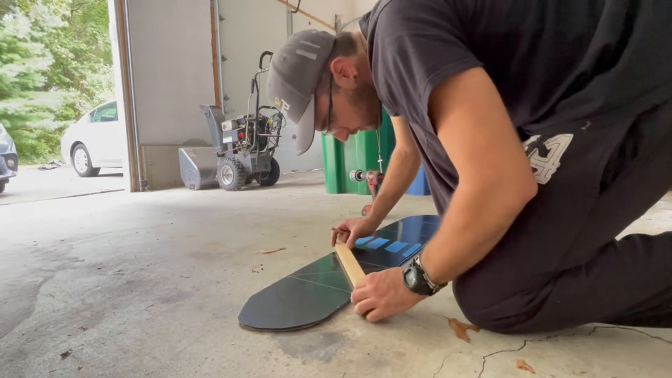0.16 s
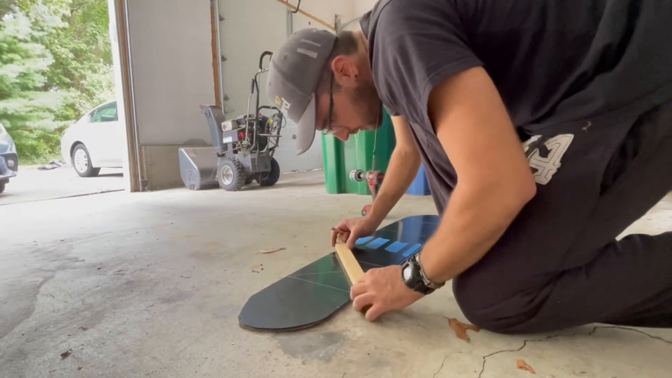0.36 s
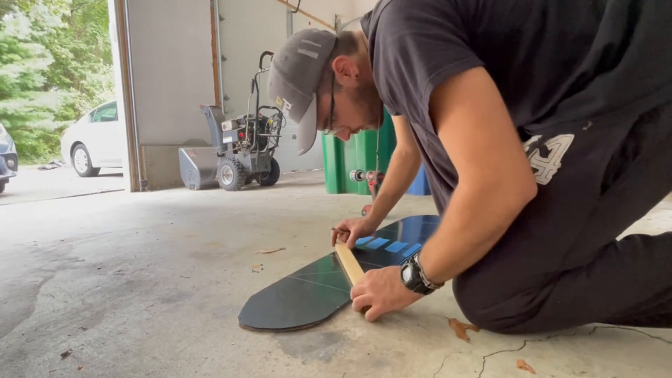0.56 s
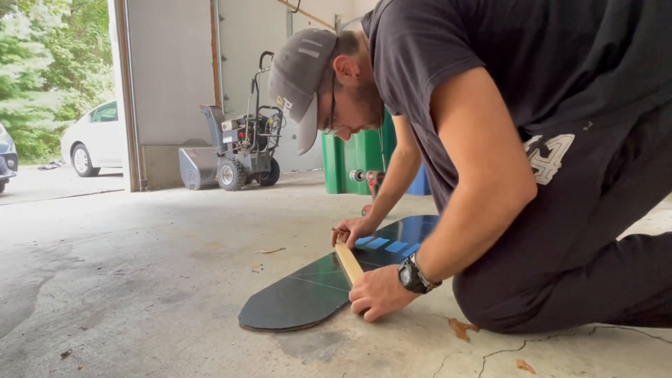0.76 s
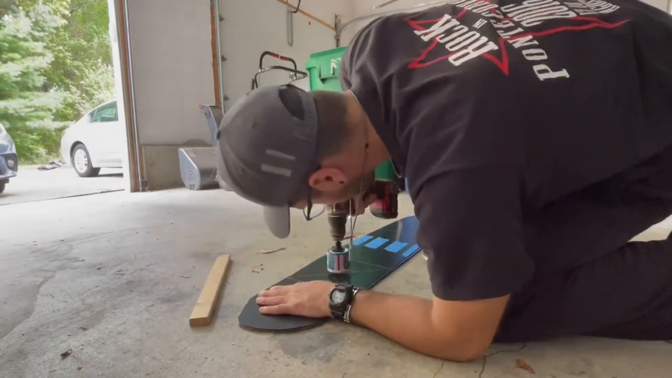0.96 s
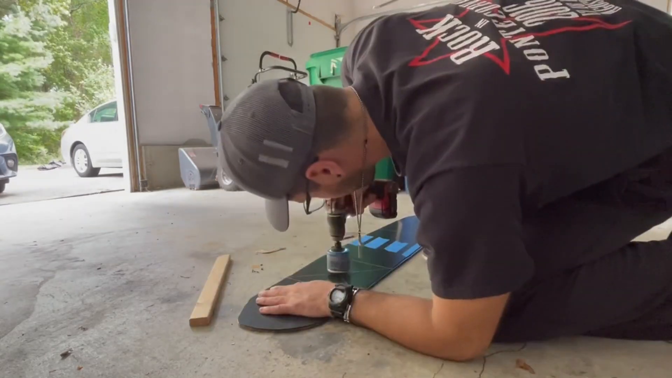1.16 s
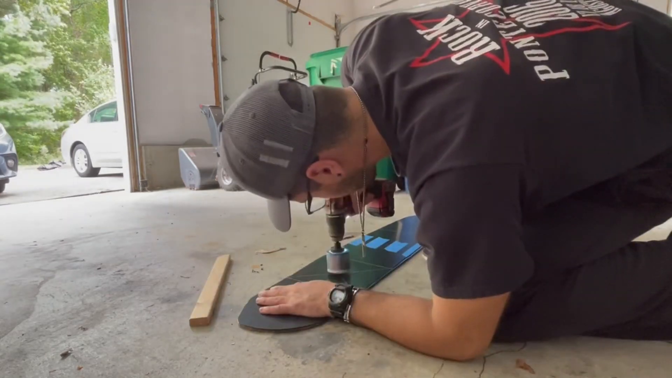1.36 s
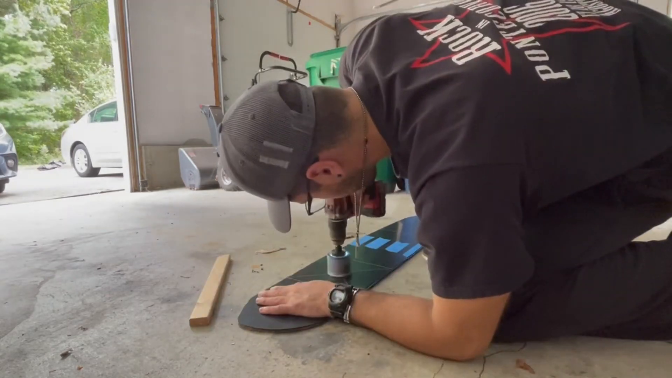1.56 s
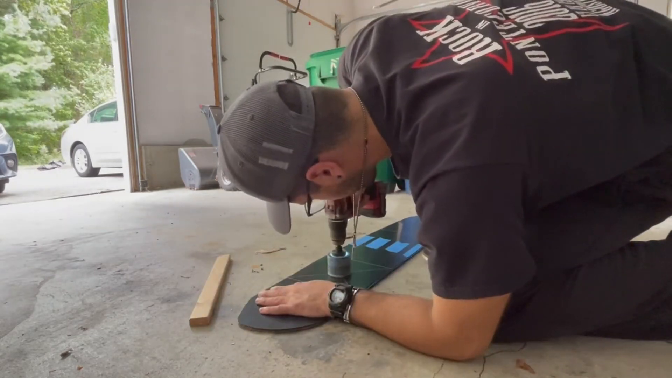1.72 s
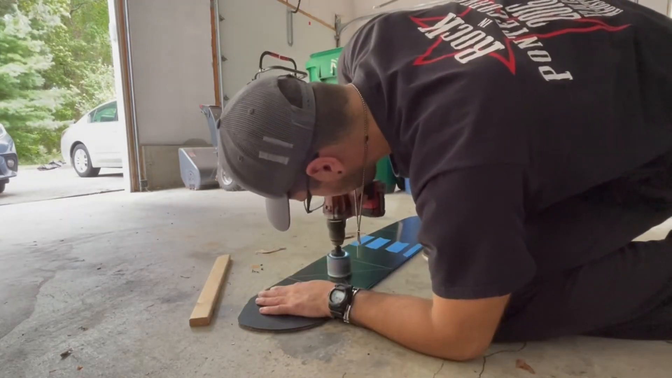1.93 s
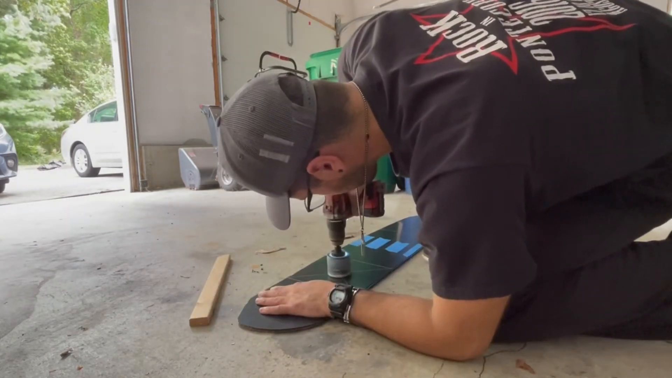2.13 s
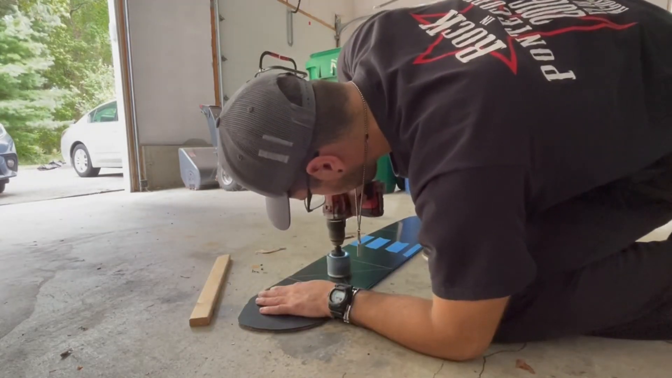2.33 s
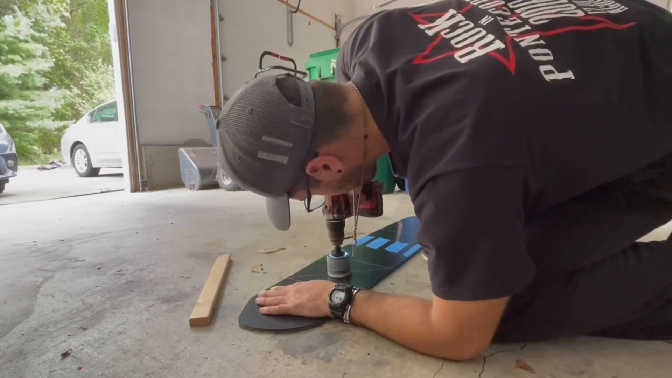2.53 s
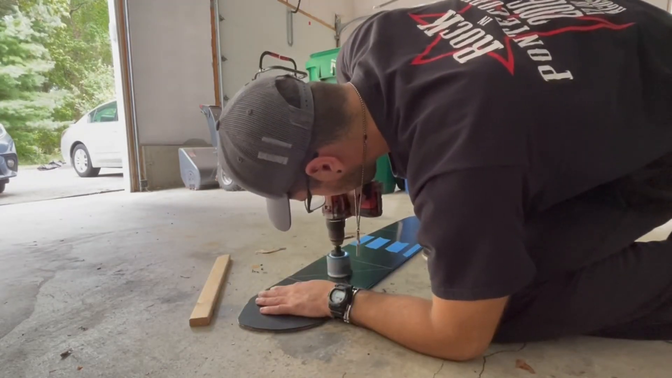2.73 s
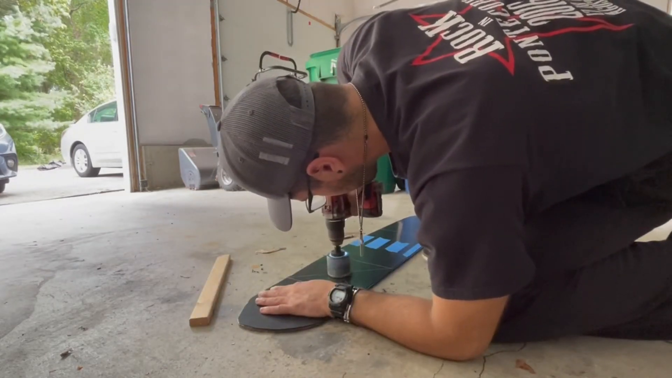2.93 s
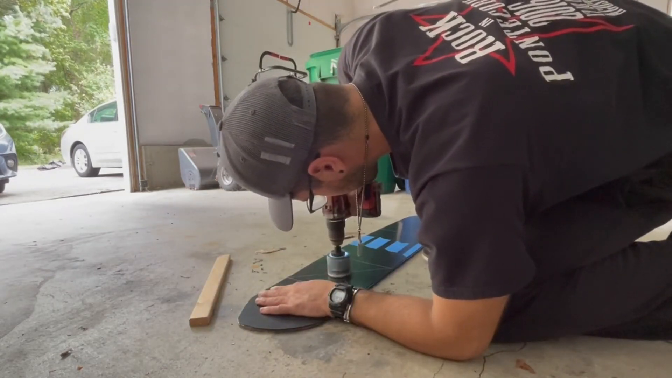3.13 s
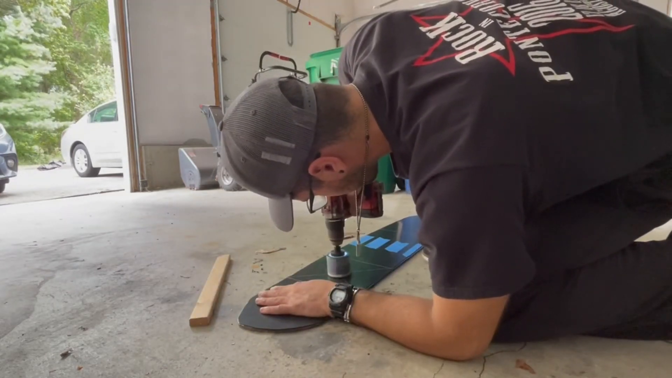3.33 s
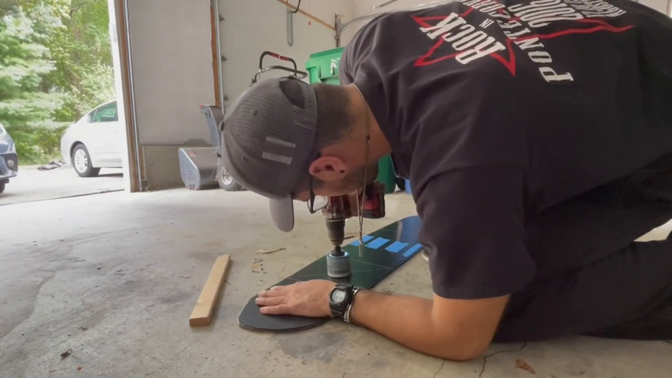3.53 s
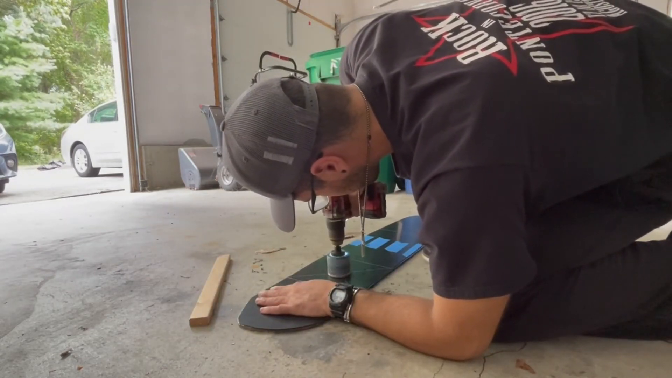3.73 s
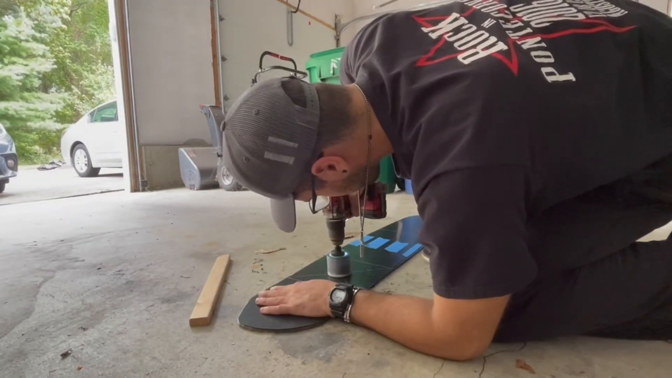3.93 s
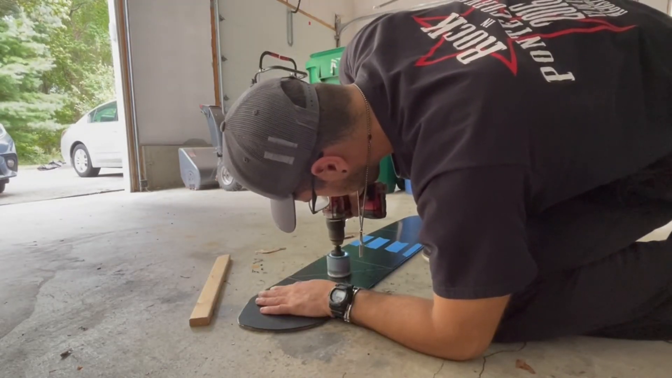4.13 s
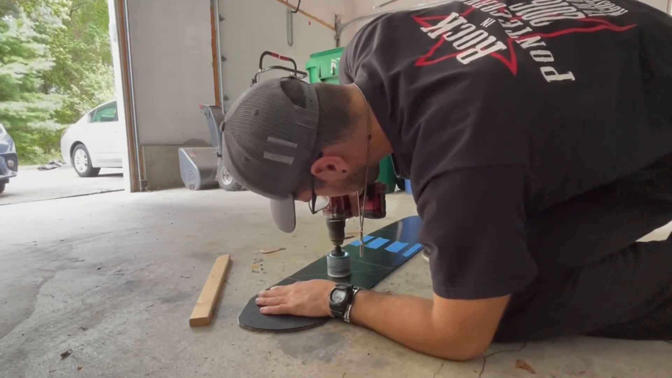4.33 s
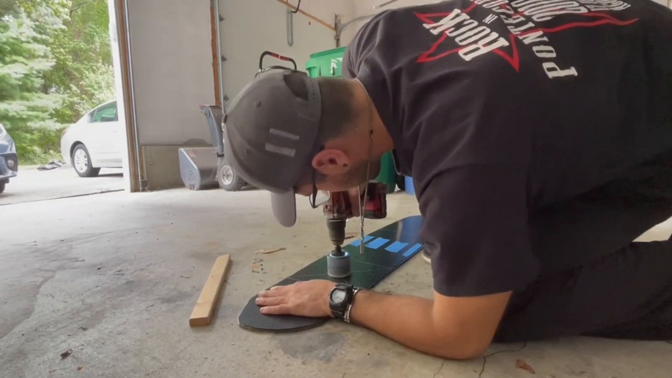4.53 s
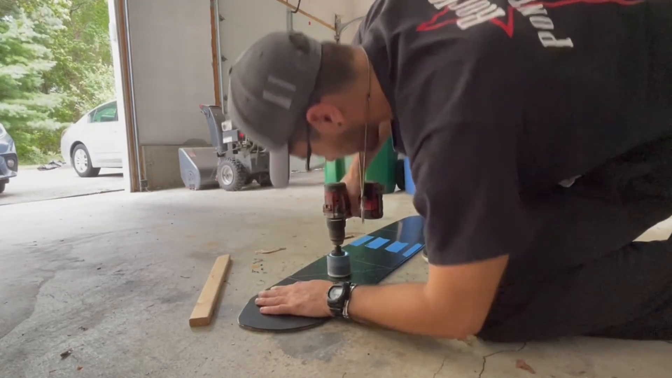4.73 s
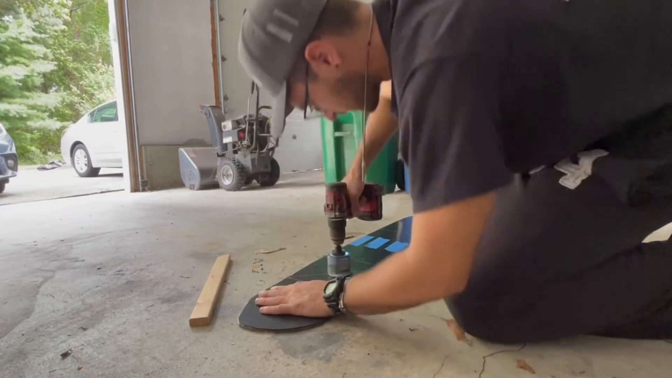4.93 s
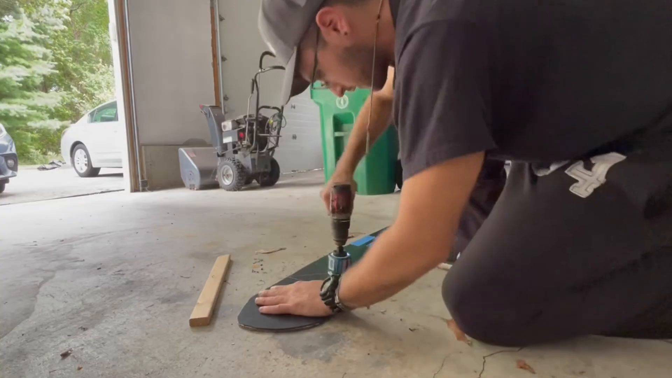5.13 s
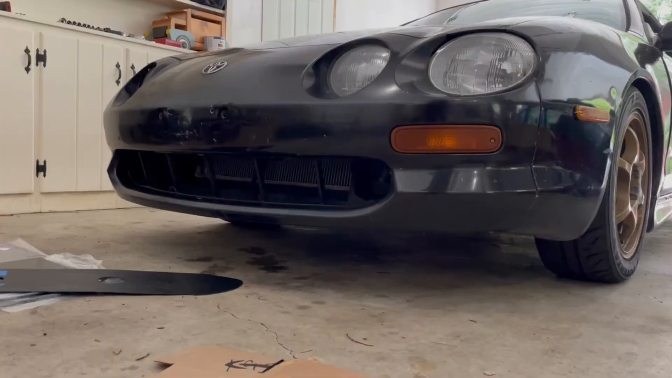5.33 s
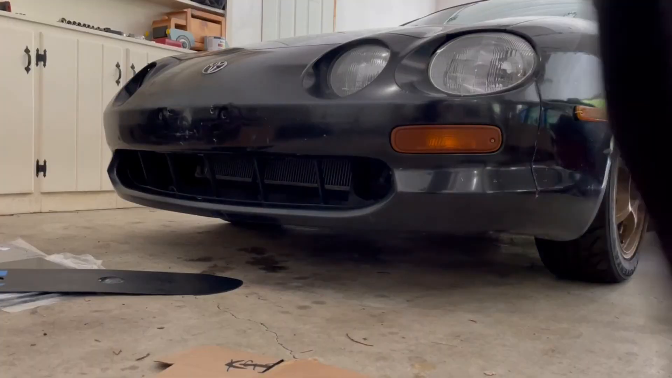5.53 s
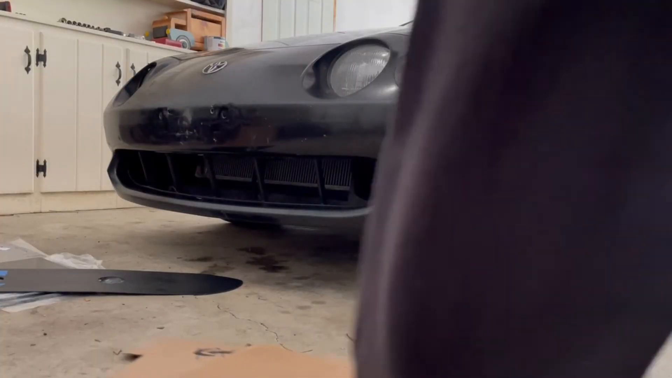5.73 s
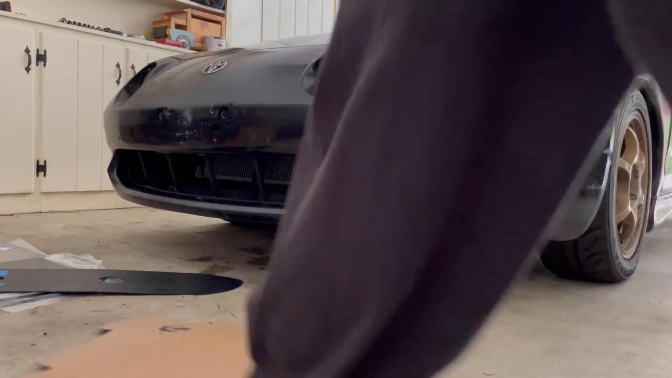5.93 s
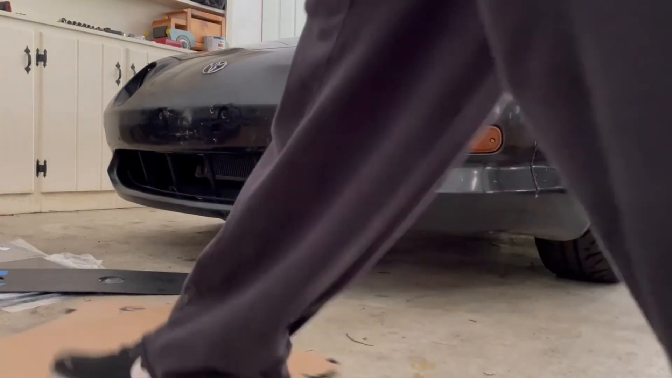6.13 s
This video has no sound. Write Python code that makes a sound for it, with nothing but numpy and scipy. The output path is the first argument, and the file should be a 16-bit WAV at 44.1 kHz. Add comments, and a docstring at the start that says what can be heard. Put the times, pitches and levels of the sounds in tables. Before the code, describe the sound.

A cordless drill with a hole saw spins up in a garage, whines and grinds through a plastic panel, stops, then something scrapes over gritty concrete.

```python
"""Outdoor air, insects, a far rumble and a low tone come first, all made of shaped noise and a sine.
Then a cordless drill with a hole saw (a toothed cup) starts, cuts a plastic panel on a garage floor and stops.
Its motor sings as sines around a switching tone, its gears whine on a moving pitch, and noise grinds the panel.
The second scene is a quieter garage corner: a tap with a falling pitch, then noise drags over gritty concrete."""
import sys
import numpy as np
from scipy import signal
from scipy.fft import rfft, irfft, next_fast_len
from scipy.io import wavfile
from scipy.ndimage import uniform_filter1d, map_coordinates

SR = 44100
rng = np.random.default_rng(int(sys.argv[2]) if len(sys.argv) > 2 else 0)


def bounce(signal):
    """Save signal as a 16-bit WAV file at the path given by the first command-line argument."""
    frames = np.transpose(np.atleast_2d(signal))
    limited = np.clip(frames, -1, 1)
    pcm = np.round(limited * 32767).astype(np.int16)
    wavfile.write(sys.argv[1], SR, pcm)


N = 276418

EDIT_S = 5.343  # the second scene begins
TOP_HZ = 15780  # nothing sounds above this

# Colour of the air at the open door, middle and side: (f/Hz, relative level/dB)
DOOR = [(15, -40), (25, 6), (123, -1), (401, -12), (949, -14.5), (1380, -21.5), (4910, -22.5),
        (5930, -20.5), (12900, -38), (15600, -69)]
DOOR_SIDE = [(15, -60), (25, -46), (140, -20), (282, -22), (786, -18), (1760, -29.5), (6090, -30),
             (11900, -50), (15600, -39)]
# Colour of the insects: (f/Hz, relative level/dB)
INSECTS = [(4600, -41), (5200, -1), (6000, 0), (6700, 1), (7200, -42)]
# A low tone from outside: (t/s, f/Hz, level/dB)
DRONE = [(0.0, 138.6, -55.5), (0.698, 141.4, -60.5), (0.874, 135, -63), (0.93, 127, -78)]

# Strength of the drilling noise: (t/s, gear rush level/dB, panel grind level/dB)
DRILL = [(.93, -67, -64), (1.13, -53, -57), (1.37, -46, -53), (1.49, -31.5, -49), (1.53, -28.5, -49),
         (1.536, -28.5, -35.5), (1.69, -28, -36.5), (3.45, -28.5, -28.5), (4.51, -29, -29),
         (4.86, -26.5, -26), (4.98, -33.5, -31.5), (5.0, -38, -34), (5.08, -46.5, -43), (5.34, -58.5, -54)]
# Colour of the gear rush, middle and side: (f/Hz, relative level/dB)
GEARS = [(710, -9.5), (1200, -0.5), (1490, -8), (2100, -1.5), (3150, -4.5), (4130, 0), (4900, -1.5),
         (6010, -6.5), (7530, -0.5), (9230, -11), (10800, -7), (13200, -18.5), (14000, -43), (14600, -81)]
GEARS_SIDE = [(710, -30), (1200, -8.5), (3020, -3), (4550, -1), (5880, -0.5), (7610, -9.5), (8850, -4),
              (11000, -19), (12300, -42), (14000, -8), (15600, -27)]
# Colour of the panel grind, middle and side: (f/Hz, relative level/dB)
PANEL = [(18, -48), (30, -23), (76, -20), (97, -11.5), (157, -8), (191, -14), (227, -10.5), (410, -10.5),
         (530, -8), (606, -8.5), (908, -3.5), (1170, -5.5), (3000, -11.5), (3900, -18), (6600, -120)]
PANEL_SIDE = [(18, -64.5), (30, -40), (160, -12), (315, -6), (794, 0), (1240, -1), (3000, -3), (3900, -31),
              (6600, -120)]
# The panel's boom: (t/s, f/Hz, width/Hz, level against grind/dB, lower mode level against grind/dB)
BOOM = [(1.5, 959, 279.7, -2.5, -21), (3.06, 960, 260.5, -12, -21), (3.2, 915, 169.7, -3.5, -17),
        (3.72, 915, 240, -8, -23), (3.9, 889, 120.2, -8, -15), (4.58, 912.4, 129.2, -13, -22),
        (4.67, 800, 330, -6, -13), (4.97, 798, 328.5, -3.5, -8)]
# The panel shakes until the cup seats: (t/s, level/dB before a fixed cut)
SHUDDER = [(1.5, -61), (1.57, -44), (1.85, -52), (2.28, -35), (2.34, -50), (2.9, -66), (2.98, -51),
           (3.7, -61)]
# The freed panel rocks on the floor: (t/s, level/dB)
ROCKING = [(4.95, -54), (5.12, -49), (5.25, -60), (5.34, -57)]
LOW_MODE_HZ = 521
LEAD_S = 4.5e-5  # the panel reaches the left channel this much sooner

# The cup's own ringing modes: (f/Hz, width/Hz, level/dB)
CUP_MODES = [(1024, 140, -14), (2230, 490, -7.5), (3450, 360, -1), (3980, 810, -1)]
# The cup shakes harder: (t/s, extra level/dB)
JOLTS = [(.984, 12), (1.1, 6.8)]
JOLT_S = 0.031  # rise time, and fall time, of a jolt
RATTLE_DB = -4.5  # the free cup against the gear rush

# The motor: (t/s, commutation f/Hz before wavering, sideband level/dB before fades)
MOTOR = [(.955, 17, -74), (.99, 55, -50), (1.04, 85, -62), (1.09, 120, -53), (1.12, 180, -52),
         (1.3, 230, -49), (1.41, 260, -57), (1.52, 1040, -44), (2.3, 1020, -44), (2.85, 903, -46),
         (3.2, 931, -46), (3.6, 1019, -46), (4.1, 1064, -46), (4.6, 1081, -45), (4.84, 1048, -46),
         (4.9, 870, -47), (4.95, 770, -41), (4.99, 560, -43), (5.01, 95, -47), (5.1, 36, -55),
         (5.2, 36, -48.5), (5.26, 25, -53.5), (5.34, 9.5, -74)]
# How the channels share the motor's song: (f/Hz, left lead/rad, left over right/dB)
MOTOR_STEREO = [(7000, -.5, -1), (7800, -.5, -1), (8400, -.4, -8), (8800, 2.8, -9)]
# Planet-gear hum: (multiple of the planet-gear rate, relative level/dB)
HUM = [(2, -10), (3, -5), (4, -9), (6, -11)]
# Strength of that hum: (t/s, level/dB)
HUM_LEVEL = [(1.5, -60), (1.94, -57), (2.02, -43), (2.3, -44.5), (2.86, -50), (3.3, -41), (3.67, -45),
             (3.85, -36.5), (4.6, -37.5), (4.95, -47)]
SWITCH_HZ = 7780
TURNS_PER_HUM = 19.3  # commutation rate over planet-gear rate
FAST_HZ = 340  # above this commutation rate the fades begin
LOWER_LOSS_DB, OTHERS_LOSS_DB, CARRIER_DB = 2, 13, -5
BRAKE_LOSS_DB = 12  # the lower sideband fades while the brake acts

# Ticks of the cup as it starts and as it slows: (t/s, level/dB before a fixed boost)
TICKS = [(.972, -43), (5.014, -32), (5.038, -27), (5.046, -29), (5.061, -27), (5.079, -35), (5.089, -32),
         (5.172, -39), (5.189, -36), (5.201, -28.5), (5.229, -33), (5.322, -45)]
TICK_HZ, TICK_T60_S = 3350, 0.012
# The garage walls' answer: (f/Hz, time to fall 60 dB/s)
WALL_DECAY = [(200, 1), (2000, 0.69), (10000, 0.019)]
# Knocks of the tool and stones cracking:
# (t/s, level/dB before a fixed cut, low ring f/Hz, high ring f/Hz, high over low ring/dB, time to fall 60 dB/s)
KNOCKS = [(.985, -33, 1020, 3300, 5, 0.01), (1.533, -2.5, 940, 2420, -4, 0.0083),
          (1.556, -9.5, 1000, 2070, 4, .012), (1.601, -12, 1240, 2190, -15, 0.0096),
          (4.99, -21, 2380, 3240, 8, 0.015), (5.29, -10, 750, 1820, -1.5, 0.0096),
          (5.575, -22, 1104, 3600, 1, 0.0045), (5.6, -18, 1500, 3360, 12, 0.0097),
          (5.632, -11, 1390, 3530, 2, 0.014), (5.646, -11.5, 1310, 2800, 19, 0.0064),
          (5.658, -13, 1400, 3000, 4, 0.0059)]

# Gear whine of the unhindered saw: (t/s, f/Hz, level/dB before fixed trims)
WHINE = [(1.395, 1050, -44), (1.425, 1580, -38), (1.45, 2250, -37), (1.472, 3150, -35), (1.492, 3750, -33),
         (1.51, 4150, -34), (1.57, 4180, -33), (1.625, 4500, -33.5), (1.78, 4450, -33), (2.05, 4250, -34.5),
         (2.79, 3810, -35), (2.9, 3680, -36), (3.06, 3740, -35.5), (3.17, 3690, -37.5), (3.43, 3930, -38.5),
         (3.47, 4060, -34), (3.65, 4110, -34.5), (3.79, 4195, -37), (4.01, 4263, -39.5),
         (4.49, 4365, -39.5), (4.7, 4360, -37.5), (4.72, 4270, -39.5), (4.865, 4230, -37),
         (4.885, 3800, -37), (4.92, 3750, -70)]
# The teeth snag and hold the gears back: (t/s of the lowest pitch, pitch drop/Hz, time to sink/s)
SNAGS = [(1.574, 500, .012), (1.71, 400, .085), (1.815, 300, .03), (1.942, 400, .02), (2.085, 320, .06),
         (2.19, 290, .04), (2.335, 340, .05), (2.5, 250, .11), (2.575, 400, .018), (2.66, 210, .025),
         (2.757, 190, .047), (2.84, 210, .03), (3.0, 250, .045), (3.125, 250, .073), (3.235, 210, .065)]
# Whine overtones that sweep through the housing's resonance: (multiple, relative level/dB)
SPIN_UP = [(2, -1.5), (3, -1.5)]
RECOVER_S, MESH_LEAD = .055, .3  # time to recover from a snag; left lead in radians
HOUSING_HZ, HOUSING_WIDTH_HZ, SCREECH_HZ, SCREECH_WIDTH_HZ = 3900, 800, 7600, 700

# Colour of the air in the quiet corner, middle and side: (f/Hz, relative level/dB)
CORNER = [(15, -41), (25, 5), (70, 0), (2070, -20.5), (2310, -14), (2600, -21), (6430, -26), (15600, -55)]
CORNER_SIDE = [(15, -32), (25, -1), (2800, -13), (6250, -18), (10700, -33), (15600, -20)]
# Strength of the dragging on concrete: (t/s, rumble level/dB, grit level/dB)
DRAG = [(5.568, -45, -38), (5.597, -37, -32), (5.602, -30.5, -23), (5.635, -27.5, -19.5),
        (5.67, -30.5, -20.5), (5.8, -27.5, -25.5), (5.86, -26.5, -23.5), (6.093, -26, -25),
        (6.12, -33, -34.5), (6.195, -33, -32.5), (6.268, -38.5, -41)]
# Colour of the rumble, middle and side: (f/Hz, relative level/dB)
RUMBLE = [(24, -59), (40, -14), (130, -9.5), (242, -1.5), (341, -0.5), (800, -0.5), (2000, -7), (2600, -12),
          (4400, -120)]
RUMBLE_SIDE = [(24, -60), (40, -28), (199, -24), (285, -13), (347, -11), (813, -5), (2000, -6), (2600, -31),
               (4400, -120)]
# Colour of the grit, middle and side: (f/Hz, relative level/dB)
GRIT = [(470, -35), (800, -5), (1000, -6), (1320, 2.5), (1800, -3.5), (2740, 1.5), (4980, -1), (7230, -6.5),
        (7890, -31), (9390, -10.5), (10600, -7.5), (12700, -12), (15600, -50)]
GRIT_SIDE = [(470, -36), (800, -17), (1440, -13), (3060, -2.5), (6150, -11), (8390, -2.5), (9620, -10),
             (12000, -25), (15600, -10)]
# The load's low note: (t/s, f/Hz, level/dB)
THUD = [(5.57, 239.4, -56), (5.8, 243.8, -37), (5.9, 238.5, -56), (6.09, 221.6, -45), (6.2, 154.5, -38)]
# Tap on a thin sheet, where treble arrives first
TAP_S, TAP_DB, TAP_T60_S = 5.5682, -16.5, 0.025
TAP_FROM_HZ, TAP_TO_HZ, TAP_FALL_S = 1750, 253, 0.00152


def amp(db):
    """Turn dB into gain."""
    return 10 ** (np.asarray(db) / 20)


def unit(x):
    """Scale to an rms of 1."""
    return x / np.sqrt(np.mean(x ** 2) + 1e-20)


def along(points, hz):
    """Read (f/Hz, value) points, joined by lines on a log frequency axis."""
    f, v = np.transpose(points)
    return np.interp(np.log(hz + 1), np.log(f + 1), v)


def curves(rows):
    """One value per sample for each column, and a gate that is open while the table lasts."""
    s, *cols = np.transpose(rows)
    t = np.arange(N) / SR
    gate = uniform_filter1d(1. * (t >= s[0]) * (t <= s[-1]), size=64)
    return [np.interp(t, s, c) for c in cols] + [gate]


def wobble(rate):
    """A smooth random curve with rate knots a second."""
    knots = rng.standard_normal(int(N * rate / SR) + 4)
    return map_coordinates(knots, [np.arange(N) * rate / SR])


def dips(rows, rise_s):
    """Sum of three-cornered bumps from (t/s, height, build time/s), each taking rise_s to end."""
    t = np.arange(N) / SR
    return sum(size * np.interp(t, [s - lead_s, s, s + rise_s], [0, 1, 0]) for s, size, lead_s in rows)


def closeness(f, centre, width):
    """A resonance as a gain: 1 at the centre, falling steeply beyond the width."""
    return np.exp(-np.clip(np.abs(f - centre) / width, 0, 4) ** 4)


def filtered(x, response):
    """Shape x by a response that depends on frequency."""
    m = next_fast_len(N + SR // 2)
    return irfft(rfft(x, m) * response(np.fft.rfftfreq(m, 1 / SR)), m)[..., :N]


def tone(hz, lead=0):
    """A stereo sine of rms 1 that follows a pitch curve, the left channel ahead by lead radians."""
    phase = 2 * np.pi * np.cumsum(hz) / SR + rng.uniform(0, 2 * np.pi)
    return np.sqrt(2) * np.sin([phase + lead / 2, phase - lead / 2])


def band(hz, width):
    """Narrow stereo noise around a moving centre: a middle of rms 1 and a half-strength side."""
    at = np.cumsum(width + np.zeros(N)) / SR
    slow = [map_coordinates(rng.standard_normal(int(at[-1]) + 4), [at], order=1) for _ in range(4)]
    phase = 2 * np.pi * np.cumsum(hz + np.zeros(N)) / SR
    m, s = (unit(a * np.sin(phase) + b * np.cos(phase)) for a, b in (slow[:2], slow[2:]))
    return np.array([m + .5 * s, m - .5 * s])


def rush(mid, side, side_db, left_db, grain_db, grain_rate, patchy_db=0):
    """Coloured stereo noise; its strength flutters at random, and patchy_db clumps it in pitch and time."""
    z = signal.stft(rng.standard_normal((2, N)), nperseg=512)[2]
    field = uniform_filter1d(rng.standard_normal(z.shape[1:]), size=3, axis=0)
    field = uniform_filter1d(field, size=6, axis=1)
    clumped = signal.istft(z * amp(patchy_db * unit(field)), nperseg=512)[1][:, :N]
    noise = amp(grain_db * wobble(grain_rate)) * clumped
    coloured = filtered(noise, lambda hz: amp([along(mid, hz), along(side, hz)]))
    m, s = map(unit, coloured)
    return np.array([m + amp(side_db) * s, m - amp(side_db) * s]) * amp([[left_db / 2], [-left_db / 2]])


def door():
    """Steady outdoor air and insects, with a wavering far rumble and a gliding low tone that stop."""
    hz, db, on = curves(DRONE)
    air = amp(-55.5 + 0.27 * wobble(9.4)) * rush(DOOR, DOOR_SIDE, -2.7, 2.8, grain_db=-1.0, grain_rate=150)
    insects = amp(-71.5) * rush(INSECTS, INSECTS, -1.5, .5, grain_db=2.5, grain_rate=57)
    rumble = amp(-60.0 + 3.6 * wobble(5.3)) * band(110, 89.5)
    return air + insects + on * (amp(db) * tone(hz) + rumble)


def grinding():
    """Gear rush, and the teeth drumming the panel's modes; both flutter as the load shifts."""
    gear_db, panel_db, on = curves(DRILL)
    load = wobble(8.3)
    gears = rush(GEARS, GEARS_SIDE, -2.4, 0.53, grain_db=1.0, grain_rate=1100, patchy_db=2.0)
    gears = amp(gear_db + 0.16 * load) * gears

    hz, width, boom_db, low_db, cutting = curves(BOOM)
    boom = amp(boom_db + 0.33 * wobble(36)) * band(hz, width)
    low_mode = amp(low_db) * band(LOW_MODE_HZ, 70)
    grind = amp(-1.0) * rush(PANEL, PANEL_SIDE, -2.5, 1.0, grain_db=0.5, grain_rate=430, patchy_db=1.5)
    panel = amp(panel_db + .5 * load + 1.3 * wobble(30)) * (grind + cutting * (boom + low_mode))
    panel = filtered(panel, lambda hz: np.exp([[1j], [-1j]] * hz * np.pi * LEAD_S))  # left arrives first

    shake_db, shaking = curves(SHUDDER)
    shudder = shaking * amp(shake_db - 7.0) * band(100, 70)
    rock_db, rocking = curves(ROCKING)
    rock = rocking * amp(rock_db) * band(170, 220)
    return on * (gears + shudder + rock + panel)


def cup():
    """Noise bands ring the loose cup's modes while the saw turns slowly; one rings on in the cut."""
    gear_db, _, on = curves(DRILL)
    slow = np.clip((850 - curves(MOTOR)[0]) / 300, 0, 1)
    level_db = gear_db + RATTLE_DB + dips([(s, db, JOLT_S) for s, db in JOLTS], JOLT_S)
    ring = sum(amp(db) * band(hz, width) for hz, width, db in CUP_MODES)
    held = (1 - slow) * amp(gear_db - 17.5 + 2.3 * wobble(30.5)) * band(3480, 60)
    return on * (slow * amp(level_db + 2.3 * wobble(70)) * ring + held)


def windings():
    """Commutation puts sidebands around a switching tone that nearly cancels; planet gears hum."""
    turn, up_db, on = curves(MOTOR)
    braking = np.clip(-np.gradient(turn) * SR / 2000, 0, 1)  # how fast the rate falls
    turn = turn * (1 + 0.00605 * wobble(15))
    speed = np.clip(turn / FAST_HZ - 1, 0, 1)  # at full speed the first pair of sidebands leads
    low_db = up_db - OTHERS_LOSS_DB * speed
    lines = [(SWITCH_HZ + turn, up_db),
             (SWITCH_HZ - turn, up_db - (LOWER_LOSS_DB + BRAKE_LOSS_DB * braking) * speed),
             (SWITCH_HZ - 2 * turn, low_db - 13),
             (SWITCH_HZ + 0 * turn, low_db + CARRIER_DB)]
    hz_at, lead, left_db = np.transpose(MOTOR_STEREO)
    sing = 0
    for hz, db in lines:
        balance = amp([[.5], [-.5]] * np.interp(hz, hz_at, left_db))
        flutter_db = (3.5 - 2 * speed) * wobble(13)
        sing = sing + amp(db + flutter_db) * tone(hz, np.interp(hz, hz_at, lead)) * balance
    # the slow planet gears hum in the panel once the shaft is up to speed
    hum = sum(amp(level + 0.51 * wobble(2.88)) * tone(k * turn / TURNS_PER_HUM) for k, level in HUM)
    fast = np.clip(turn / 300 - 2, 0, 1)
    return on * (sing + fast * amp(curves(HUM_LEVEL)[0]) * hum)


def ticks():
    """Each tick is a short gritty burst around the cup's strong treble ring."""
    out, t = np.zeros(N), np.arange(SR // 20) / SR
    for s, db in TICKS:
        noise = rng.standard_normal((2, len(t)))
        rough = 1 + .6 * unit(uniform_filter1d(noise[0], size=30))
        hz = TICK_HZ * (1 + rng.normal(0, .03))
        ring = rough * np.sin(2 * np.pi * hz * t) + .4 * uniform_filter1d(noise[1], size=4)
        fade = amp(db + 6 - 60 * t / TICK_T60_S) * (1 - np.exp(-t / 0.001))
        out[round(s * SR):][:len(t)] += fade * ring
    return out


def garage(x):
    """Echoes as fading noise: each frequency of the walls' answer dies at its own speed."""
    hz, t, z = signal.stft(rng.standard_normal((2, SR // 2)), SR, nperseg=256)
    decay = amp(-60 * t / along(WALL_DECAY, hz)[:, None])
    tail = signal.istft(z * decay, SR, nperseg=256)[1]
    delayed = np.pad(x, (300, 0))[None]
    return signal.fftconvolve(delayed, tail / np.linalg.norm(tail[0]), axes=1)[:, :N]


def knocks():
    """Two damped rings and a noisy crack for each blow."""
    out, t = np.zeros(N), np.arange(SR // 8) / SR
    for s, db, low_hz, high_hz, high_db, t60 in KNOCKS:
        ring = np.sin(2 * np.pi * low_hz * t) + amp(high_db) * np.sin(2 * np.pi * high_hz * t)
        fade = amp(-60 * t / t60) * (1 - np.exp(-t / 0.00062))
        crack = 0.38 * amp(-60 * t / 0.0035) * uniform_filter1d(rng.standard_normal(len(t)), size=4)
        out[round(s * SR):][:len(t)] += amp(db - 8.5) * (ring * fade + crack)
    return out


def whine():
    """Meshing gear teeth whine; the octave screeches and a rough band lies near half the pitch."""
    t = np.arange(N) / SR
    hz, db, on = curves(WHINE)
    hz = uniform_filter1d(hz - dips(SNAGS, RECOVER_S), size=300)
    strain = np.clip((4300 - uniform_filter1d(hz, size=8000)) / 500, 0, 1)  # a low pitch means heavy load
    hz = hz * (1 + (.003 + .006 * strain) * wobble(130))

    overtones = 0
    for k, level in SPIN_UP:
        resonance = closeness(k * hz, HOUSING_HZ, HOUSING_WIDTH_HZ)
        overtones = overtones + amp(level) * resonance * tone(k * hz, MESH_LEAD)
    pitch = tone(hz, MESH_LEAD) + .45 * strain * band(hz, 130)
    pitch = closeness(hz, HOUSING_HZ, HOUSING_WIDTH_HZ + 200) * pitch
    mesh = amp(db - 1 + (1.5 + 1.3 * strain) * wobble(60)) * (pitch + overtones)

    # screech and rough band stay silent until the teeth bite
    bite = np.clip((t - 1.48) / 0.069, 0, 1)
    screech = closeness(2.04 * hz, SCREECH_HZ, SCREECH_WIDTH_HZ) * amp(db - 2.0) * band(2.05 * hz, 120)
    half_hz = .52 * uniform_filter1d(hz, size=8000)
    half_band = band(half_hz, np.interp(t, [3.5, 4.0], [340, 40]))  # it narrows late in the cut
    half = amp(db - 6.5 - 8.0 * strain + 1.5 * wobble(35)) * half_band
    return on * mesh, on * bite * (screech + half)


def chips(count=260):
    """Teeth tear chips out of the plastic: brief dull clicks at random moments of the cut."""
    out, t = np.zeros(N), np.arange(200) / SR
    for u, size, pitch in rng.random((count, 3)):
        fade = amp(-60 * t / 0.0038) * (1 - np.exp(-t / 0.00015))
        click = np.sin(2 * np.pi * 800 * 4.5 ** pitch * t) * fade
        out[round((1.55 + 3.4 * u) * SR):][:len(t)] += amp(-24 + 9 * size) * click
    return out


def squeaks(count=45):
    """Short steady treble chirps at random moments while the teeth bite deepest."""
    out, t = np.zeros(N), np.arange(400) / SR
    for u, size, pitch in rng.random((count, 3)):
        chirp = np.sin(2 * np.pi * (10200 + 700 * pitch) * t) * np.sin(np.pi * t / t[-1]) ** 2
        out[round((3.25 + 1.2 * u) * SR):][:len(t)] += amp(-40.0 + 12.8 * size) * chirp
    return out


def corner():
    """Quiet air as coloured noise, with faint insects as two narrow noise bands."""
    air = amp(-62) * rush(CORNER, CORNER_SIDE, -6, 1.5, grain_db=1.0, grain_rate=29)
    return air + amp(-74.0) * (band(6100, 900) + band(3100, 300))


def drag():
    """Grit crunches under the load while the load itself rumbles; stronger on the left."""
    low_db, high_db, on = curves(DRAG)
    thud_hz, thud_db, _ = curves(THUD)
    grit = rush(GRIT, GRIT_SIDE, -3.0, 2.5, grain_db=1.0, grain_rate=1000, patchy_db=1.5)
    grit = amp(high_db + 1.3 * wobble(45)) * grit
    rumble = rush(RUMBLE, RUMBLE_SIDE, -4.0, 3.3, grain_db=-1.0, grain_rate=280)
    rumble = amp(low_db + 0.47 * wobble(25)) * rumble
    return on * (grit + rumble + amp(thud_db) * band(thud_hz, 90))


def sheet_tap():
    """One full knock on a thin sheet, whose pitch falls within milliseconds."""
    out, t = np.zeros(N), np.arange(SR // 20) / SR
    cycles = TAP_TO_HZ * t + (TAP_FROM_HZ - TAP_TO_HZ) * TAP_FALL_S * (1 - np.exp(-t / TAP_FALL_S))
    fade = amp(TAP_DB - 60 * t / TAP_T60_S) * (1 - np.exp(-t / 0.00085))
    out[round(TAP_S * SR):][:len(t)] = -fade * np.sin(2 * np.pi * cycles)
    return out


def scene():
    """The drilling, then a straight cut to the quiet corner."""
    before = np.arange(N) < EDIT_S * SR
    mesh, rough = whine()
    hits = knocks()
    near = squeaks() + chips() + ticks() + hits * before
    echo = amp(-6) * garage(amp(-5) * near + amp(-11) * mesh[0])
    drilling = door() + grinding() + cup() + windings() + rough + mesh
    drilling = drilling + near * amp([[.6], [-.6]]) + echo

    tap = hits * ~before + sheet_tap()
    quiet = corner() + drag() + tap * amp([[1.5], [-1.5]]) + amp(-13) * garage(tap)
    return np.where(before, drilling, quiet)


def record(dry):
    """The left is a little weaker near 8.5 kHz; a bass cut, and nothing above the band limit."""
    def response(hz):
        shade = amp([[-1.3], [1.3]] * np.exp(-((hz - 8500) / 1500) ** 2))
        bass_cut = hz ** 4 / (hz ** 4 + 38 ** 4)
        return shade * bass_cut * (hz < TOP_HZ)
    return filtered(dry, response)


dry = scene()
out = record(dry)
bounce(out)
```